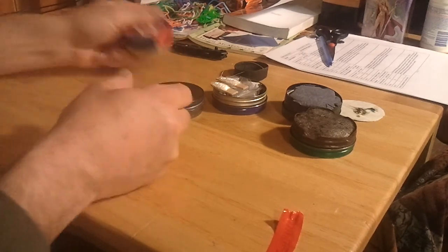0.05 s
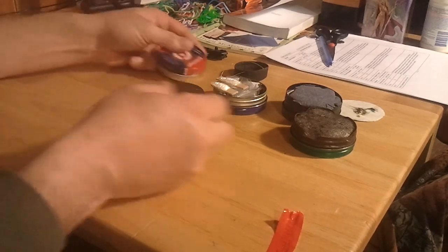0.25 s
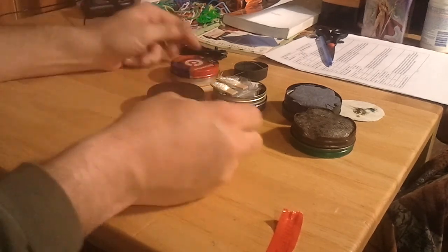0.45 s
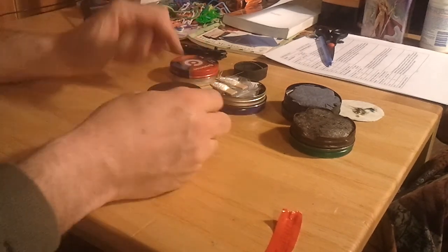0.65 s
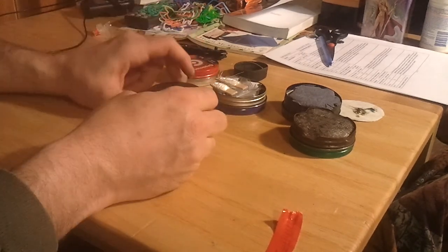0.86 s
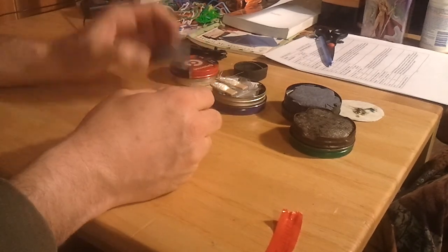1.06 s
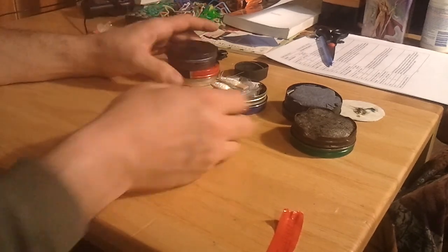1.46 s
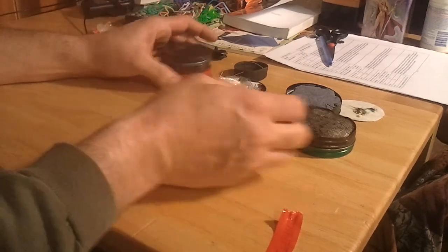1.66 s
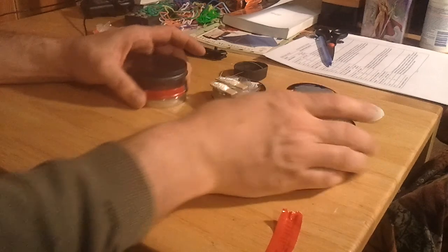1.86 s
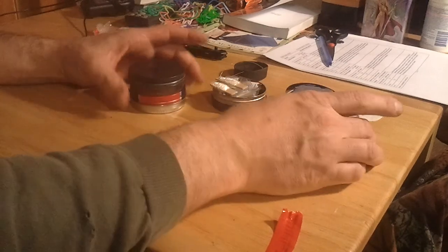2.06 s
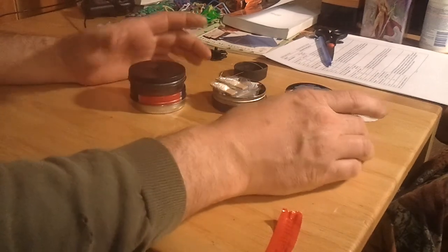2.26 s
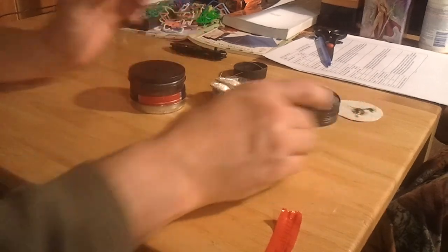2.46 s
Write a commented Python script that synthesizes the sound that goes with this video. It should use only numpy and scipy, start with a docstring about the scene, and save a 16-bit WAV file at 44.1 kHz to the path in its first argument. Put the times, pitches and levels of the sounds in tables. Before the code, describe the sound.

A small metal tin knocks twice on a wooden table, rim first and then flat. A second later another tin is stacked on it with a short rattle. Fingers and a sleeve rustle faintly, close up in a small room.

```python
"""Stacking tins on a table

A small red tin lands on a wooden table, rim first and then flat; a dark tin is stacked on it with a
short rattle. Each knock rings the wood or the metal, and the tabletop thuds under the landings.
Fingers tap and scuff the tins, which squeak faintly, and a sleeve slides over the wood in a small
furnished room. The close microphone hears little above 8 kHz and overloads on the knocks."""
import sys
import numpy as np
from scipy import signal
from scipy.fft import rfft, irfft
from scipy.io import wavfile

SR = 44100
rng = np.random.default_rng(int(sys.argv[2]) if len(sys.argv) > 2 else 0)


def generate_wav(sig):
    """Save sig (samples, or channels by samples) to the path in sys.argv[1] as 16-bit PCM at SR."""
    pcm = np.round(np.clip(np.atleast_2d(sig).T, -1, 1) * 32767).astype(np.int16)
    wavfile.write(sys.argv[1], SR, pcm)


N = 110250

# hits of each landing (time [s], level [dB], contact corner [Hz], treble above the corner [dB])
RIM_HITS = [(.2320, 0.5, 4000, -6.5), (.2404, -13, 4000, 14)]
RED_HITS = [(.4378, -20.5, 810, -24.5), (.4455, -15, 3000, 9.5), (.4474, 1.5, 4030, -8.5),
            (.4528, -5, 4000, 0.5), (.4725, -11, 4000, -11)]
STACK_HITS = [(1.3760, -7.5, 1130, -13.5), (1.4018, -8.5, 980, -5), (1.4066, -0.5, 3940, -0.5),
              (1.4290, -4.5, 3500, 1), (1.4320, -19, 4000, 11), (1.4562, -20, 4000, -7)]
# clear ring of the tabletop, the red tin and the stacked pair (pitch [Hz], relative level [dB], t60 [s])
TABLE_MODES = [(153.2, -1.5, 0.21), (277, 2, 0.2), (392, -7, .1), (685, 11, 0.06), (912, 4, 0.19),
               (1180, 7.5, 0.063), (1328, 2.5, .1), (1473, -5, 0.26), (1806, -12, 0.2), (1870, -13, 0.031),
               (2116, -16, .07), (2280, -14.5, 0.083), (5140, -14, .07)]
RED_MODES = [(844, 7.5, 0.081), (1009, 7.5, 0.079), (1412, 6.5, 0.28), (1493, 0, 0.094), (1580, -6.5, 0.46),
             (1930, -9.5, 0.2), (2790, -12, 0.037), (2790, -4, 0.095), (3255, 3, 0.12), (3915, -8, 0.34),
             (3880, -5, 0.12), (4210, -3, .15), (5177, -11, .3), (6430, -17, 0.12)]
STACK_MODES = [(397, -6, .11), (527, 10, 0.065), (650, 4, 0.05), (686, -17, 0.059), (920, 6.5, 0.049),
               (1134, 6.5, 0.05), (1480, -7, .1), (2110, -12, 0.13), (3870, -9, .14), (5094, -3.5, 0.13),
               (5466, -4, .1), (6380, -11.5, 0.17), (7000, -5, 0.16), (7220, -2.5, 0.083)]
# tone of the clatter, the dense crowd of modes in between (frequency [Hz], relative level [dB])
TABLE_CROWD = [(30, -22), (70, -10.5), (250, -7), (360, -9.5), (520, -2), (750, 0.5), (1800, -1),
               (2700, -12), (5000, -13), (7800, -16.5)]
RED_CROWD = [(60, 1.5), (200, -13), (330, -28.5), (480, -13.5), (800, -1), (1180, -16), (1480, 2.5),
             (1720, -16.5), (1980, 1), (2350, -15.5), (2900, -5), (4700, -10), (6500, -5), (7800, -9)]
STACK_CROWD = [(30, -28), (90, -8), (280, -12.5), (550, 2.5), (1300, -1.5), (1800, -6.5), (3400, -8.5),
               (4500, -16.5), (7600, -7)]
# thuds of the table (time [s], level [dB])
THUDS = [(0.233, -30), (0.45, -32), (1.409, -36), (2.294, -50)]
# its low bending modes (pitch [Hz], relative level [dB], t60 [s])
FLEX_MODES = [(62, -6, 0.33), (86, -4, .17), (150.3, -2.5, 0.19), (190.4, 3.5, 0.18)]
# finger taps and clicks (time [s], level [dB], centre [Hz], half-width [octaves], t60 [s])
TAPS = [(.0735, -33.5, 5500, 1.3, 0.055), (.0825, -33.5, 5500, 2.3, 0.028), (.103, -24, 6850, 0.52, 0.019),
        (.110, -31.5, 2000, 0.23, .02), (.115, -26.5, 6200, .4, 0.019), (.1435, -32, 1970, 0.17, 0.014),
        (.149, -31.5, 1900, 0.22, 0.011), (.177, -31.5, 7000, 0.34, 0.025), (.2018, -25, 2430, 0.55, .008),
        (.352, -37.5, 2300, .6, 0.018), (.970, -52.5, 6200, 0.24, 0.019), (.972, -49, 736, 0.83, 0.077),
        (1.2185, -42.5, 1760, .9, 0.045), (2.290, -41, 587, 1.34, 0.074), (2.318, -45, 1030, 0.75, 0.075)]
# fader moves for fingers on tin and for sleeve and hand on wood (time [s], level [dB])
SCUFF_FADER = [(0, -47), (.04, -46), (.115, -38), (.16, -44.5), (.22, -38), (.34, -54), (.43, -49.5),
               (.6, -52.5), (.8, -68.5), (1.5, -65), (1.6, -55), (1.7, -67), (2.18, -63), (2.255, -63.5),
               (2.28, -47.5), (2.35, -75), (2.405, -46.5), (2.44, -53), (2.5, -58.5)]
SLEEVE_FADER = [(0, -64.5), (.3, -51), (.43, -50.5), (.62, -60.5), (.69, -58), (.78, -61), (1.58, -63),
                (1.62, -56), (1.65, -45.5), (1.675, -53.5), (1.73, -53), (1.81, -44), (1.88, -45),
                (1.92, -50), (2.02, -51), (2.12, -61), (2.18, -58), (2.2, -52), (2.26, -61.5), (2.36, -58),
                (2.39, -60), (2.44, -52.5), (2.5, -58)]
# tone of those two rubs (frequency [Hz], relative level [dB])
SCUFF_COLOUR = [(100, -38.5), (500, -17), (1000, -4.5), (2000, -6.5), (2800, -4.5), (4200, -3), (5500, -1),
                (7500, 0.5)]
SLEEVE_COLOUR = [(80, -6.5), (220, -13), (280, 5), (335, -17), (395, 3), (455, -7.5), (525, 1), (750, 0.5),
                 (1500, -5.5), (2300, -12.5), (4500, -15.5), (7500, -14.5)]
# squeaks of a slipping tin (midpoint [s], length [s], level [dB], centre [Hz], width [Hz])
SQUEAKS = [(0.44, 0.054, -42.5, 670, 129), (1.005, .04, -48.5, 740, 303), (2.27, 0.015, -61, 4100, 301),
           (2.425, 0.082, -52.5, 4140, 300)]
# slap off nearby surfaces (delay [s], level [dB])
ECHOES = [(.00785, -15), (0.0164, -28), (0.024, -22)]
# decay of the room (frequency [Hz], t60 [s])
ROOM_T60 = [(60, 0.17), (200, 0.23), (600, 0.25), (1500, 0.23), (4000, 0.29), (8000, 0.24)]
# tone of the still room (frequency [Hz], relative level [dB])
AIR_COLOUR = [(20, 5.5), (45, 2.5), (90, -4), (180, -6), (400, -9.5), (800, -24), (2000, -23),
              (4000, -23.5), (7800, -26), (10000, -23)]
# microphone EQ before and after the overload (frequency [Hz], gain [dB])
MIC_EQ = [(20, 2.5), (7600, 0.5), (8200, -5), (8700, -16.5), (9300, -63), (22050, -104)]
OVERLOAD_EQ = [(8500, 1), (10000, -8), (16000, 1.5)]

MODE_RISE_S, FLEX_RISE_S = 0.00041, 0.0036
CRACK_DB, CRACK_T60 = -8, .004  # the instant of contact
ROOM_DB, ROOM_BUILD_S, AIR_DB = -6, 0.0092, -53.5
LOW_CUT_HZ, HIGH_CUT_HZ, CEILING = 44.6, 16200, .7


def tins():
    """Rim on wood, tin falling flat, tin on tin."""
    rim = knocks(RIM_HITS, TABLE_MODES, TABLE_CROWD, ring_db=-24, crowd_db=-8, t60=0.052, tail_db=-33.5)
    flat = knocks(RED_HITS, RED_MODES, RED_CROWD, ring_db=-22.5, crowd_db=-7, t60=0.06, tail_db=-30)
    stack = knocks(STACK_HITS, STACK_MODES, STACK_CROWD, ring_db=-25, crowd_db=-7, t60=0.045, tail_db=-34)
    return rim + flat + stack


def knocks(hits, modes, crowd, ring_db, crowd_db, t60, tail_db):
    """Clear modes, a dense clatter that dies in t60, and room; each hit has its own level and treble."""
    out, t = np.zeros(N), np.arange(SR // 2) / SR
    ring = sum((-1) ** k * mode(t, *row) for k, row in enumerate(modes))
    ring *= amp(ring_db) * (1 - np.exp(-t / MODE_RISE_S))
    for s, db, corner_hz, treble_db in hits:
        fade = amp(crowd_db - 60 * t / t60) + amp(CRACK_DB - 60 * t / CRACK_T60)
        clatter = unit(colour(even_noise(len(t)), crowd)) * fade
        tail = unit(colour(room_tail(), crowd)) * np.linspace(1, 0, len(t))
        knock = ring + clatter + amp(tail_db) * tail
        body, treble = pass_band(knock, "low", corner_hz), pass_band(knock, "high", corner_hz)
        add(out, s, amp(db) * (body - amp(treble_db) * treble))  # minus keeps the bands in phase
    return out


def thuds():
    """Low-end weight: the table flexes under a landing."""
    out, t = np.zeros(N), np.arange(SR // 2) / SR
    flex = sum(mode(t, *row) for row in FLEX_MODES) * (1 - np.exp(-t / FLEX_RISE_S))
    for s, db in THUDS:
        add(out, s, amp(db) * flex)
    return out


def taps():
    """Small contacts damped by the fingers: short bursts of band noise."""
    out, t = np.zeros(N), np.arange(8192) / SR
    f = np.fft.rfftfreq(len(t), 1 / SR) + 1
    for s, db, hz, octaves, t60 in TAPS:
        band = 1 / (1 + (np.log2(f / hz) / octaves) ** 2)
        fade = amp(-60 * t / t60)
        burst = irfft(rfft(even_noise(len(t))) * band) * fade
        add(out, s, amp(db) * burst * np.linalg.norm(fade) / np.linalg.norm(burst))
    return out


def rub(fader, spectrum, slips_per_s, spread_db, grain):
    """Friction: tiny slips of uneven size over a smooth hiss."""
    slips = (rng.random(N) < slips_per_s / SR) * rng.standard_normal(N)
    slips *= amp(spread_db * np.minimum(rng.exponential(1, N), 3))
    texture = grain * unit(slips) + rng.standard_normal(N)
    gain = amp(np.interp(np.arange(N) / SR, *np.transpose(fader)))
    return gain * unit(colour(texture, spectrum + [(11000, -40)]))


def squeaks():
    """A tin slips, and friction keeps one resonance going for a moment."""
    out, size = np.zeros(N), SR // 4
    f = np.fft.rfftfreq(size, 1 / SR)
    for s, length, db, hz, width in SQUEAKS:
        resonance = 1 / (1 + (2 * (f - hz) / width) ** 2)
        ring = irfft(rfft(even_noise(size)) * resonance)
        swell = np.sin(np.linspace(0, np.pi, round(length * SR)))
        add(out, s - length / 2, amp(db) * swell * unit(ring[:len(swell)]))
    return out


def echoes(x):
    """Adds the early reflections off nearby surfaces."""
    out = x.copy()
    for s, db in ECHOES:
        add(out, s, amp(db) * x)
    return out


def room_tail():
    """The room's diffuse reverb: noise that builds up and dies band by band, energy 1."""
    size = SR // 2
    hz, t, bands = signal.stft(even_noise(size), SR, nperseg=256)
    decay = amp(-60 * t / read(ROOM_T60, hz)[:, None])
    tail = signal.istft(bands * decay, SR, nperseg=256)[1][:size]
    tail *= 1 - np.exp(-np.arange(size) / SR / ROOM_BUILD_S)
    return tail / np.linalg.norm(tail)


def room_tone():
    """Still air: a faint, steady bed of rumble and hiss."""
    return amp(AIR_DB) * unit(colour(rng.standard_normal(N), AIR_COLOUR))


def mode(t, hz, db, t60):
    """One resonance: a dying sine."""
    return amp(db - 60 * t / t60) * np.sin(2 * np.pi * hz * t)


def amp(db):
    """Decibels to gain."""
    return 10 ** (np.asarray(db) / 20)


def unit(x):
    """Scales to rms 1."""
    return x / np.sqrt(np.mean(x ** 2) + 1e-20)


def read(points, hz):
    """Reads a curve on a log-frequency axis."""
    f, value = np.transpose(points)
    return np.interp(np.log(hz + 1), np.log(f + 1), value)


def add(mix, s, sound):
    """Mixes a sound in at time s."""
    part = mix[max(round(s * SR), 0):][:len(sound)]
    part += sound[:len(part)]


def colour(x, points):
    """Applies an EQ curve."""
    return irfft(rfft(x) * amp(read(points, np.fft.rfftfreq(len(x), 1 / SR))), len(x))


def pass_band(x, kind, hz):
    """Low- or high-pass, 12 dB per octave."""
    return signal.lfilter(*signal.butter(2, hz, kind, fs=SR), x)


def even_noise(size):
    """Noise with a flat spectrum and random phases."""
    return unit(irfft(np.exp(2j * np.pi * rng.random(size // 2 + 1)), size))


def scene():
    """Knocks up front, handling behind them, room tone underneath."""
    fingers = rub(SCUFF_FADER, SCUFF_COLOUR, slips_per_s=740, spread_db=-1.5, grain=0.84)
    sleeve = rub(SLEEVE_FADER, SLEEVE_COLOUR, slips_per_s=1200, spread_db=3.5, grain=0.66)
    air = room_tone()
    landings = echoes(tins()) + thuds()
    tapping = taps()
    tap_reverb = amp(ROOM_DB) * signal.fftconvolve(tapping, room_tail())[:N]
    return (landings + tapping + tap_reverb + fingers + sleeve + squeaks() + air)[None]


def record(dry):
    """The microphone's narrow band, overload on the peaks, then a steep high cut."""
    heard = pass_band(colour(dry[0], MIC_EQ), "high", LOW_CUT_HZ)
    clipped = heard / (1 + (heard / CEILING) ** 12) ** (1 / 12)
    high_cut = signal.firwin(511, HIGH_CUT_HZ, window=("kaiser", 9), fs=SR)
    return signal.oaconvolve(colour(clipped, OVERLOAD_EQ), high_cut, "same")[None]


dry = scene()
out = record(dry)
generate_wav(out)
```